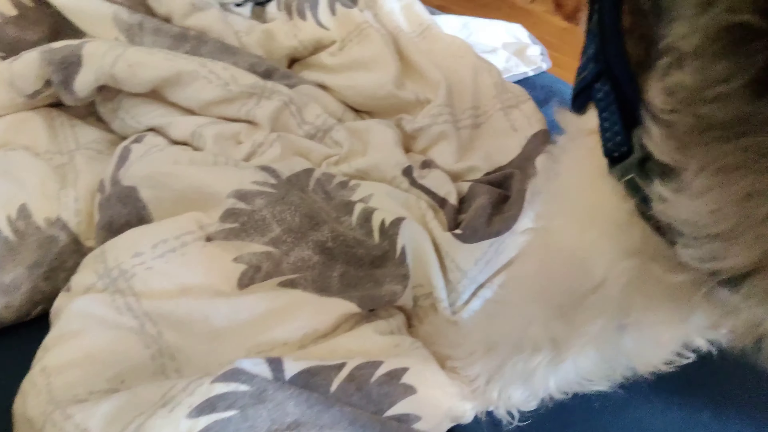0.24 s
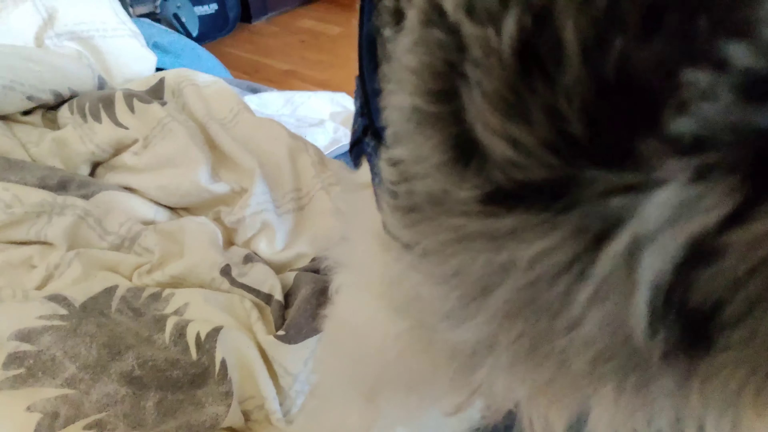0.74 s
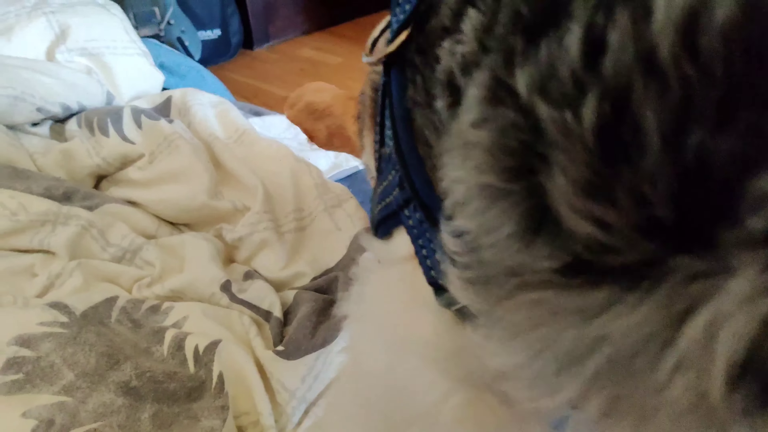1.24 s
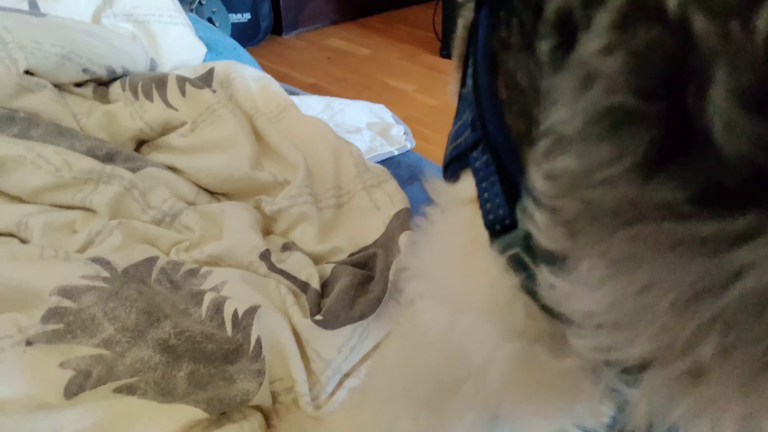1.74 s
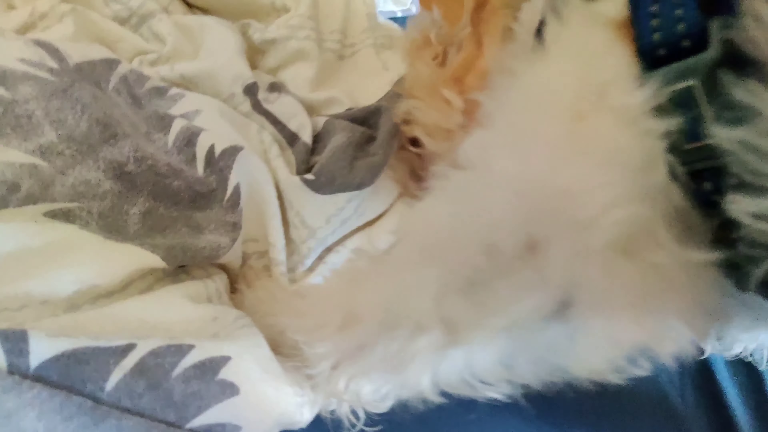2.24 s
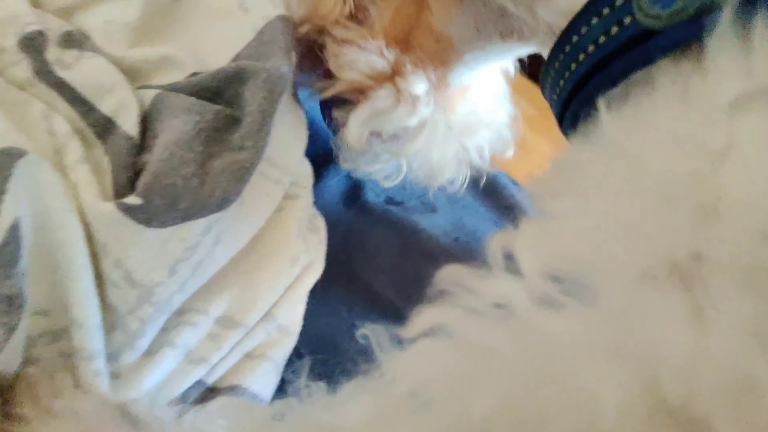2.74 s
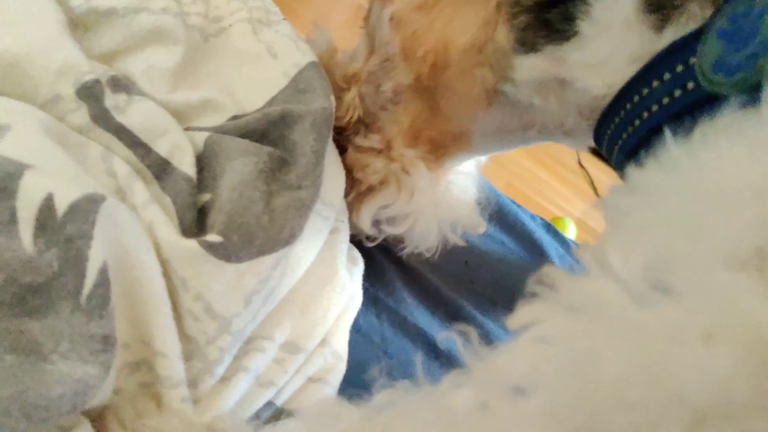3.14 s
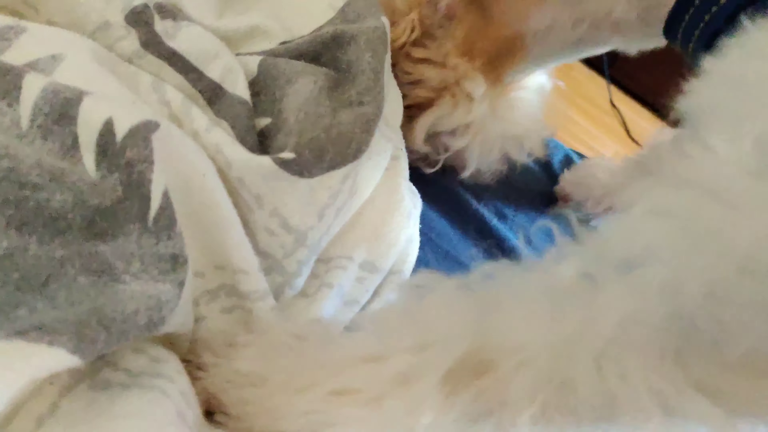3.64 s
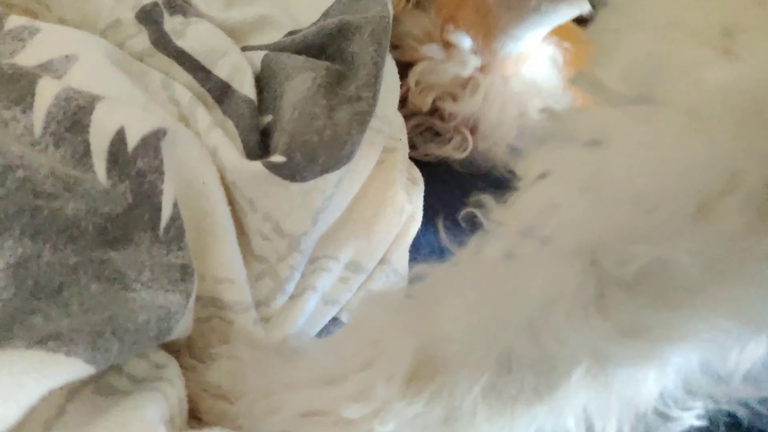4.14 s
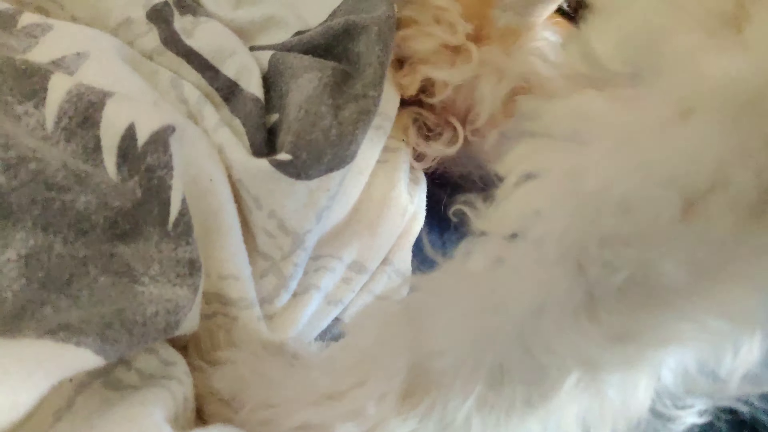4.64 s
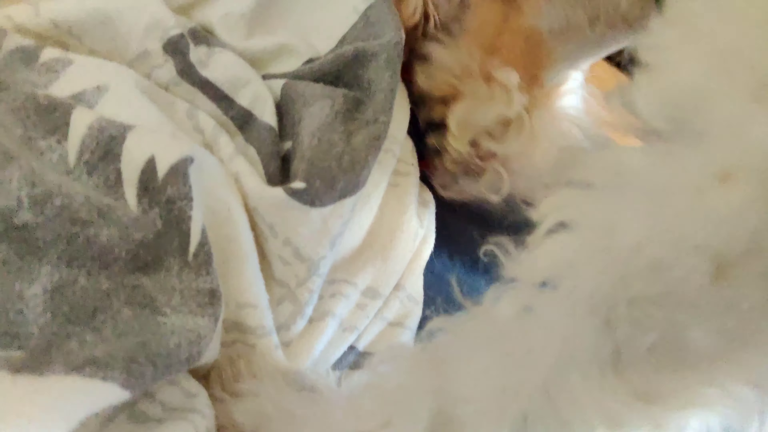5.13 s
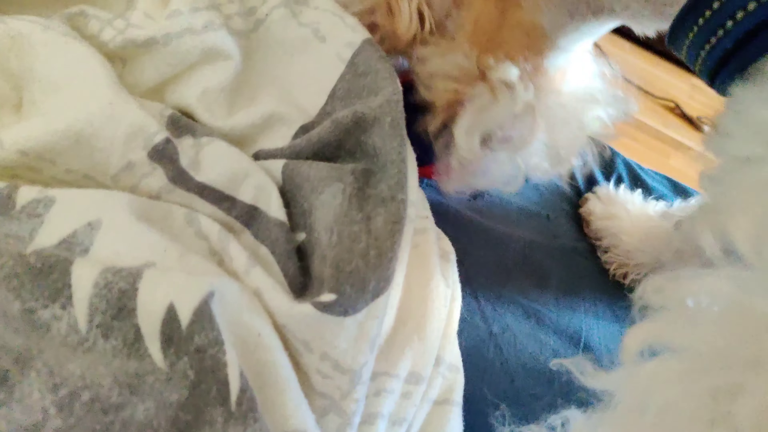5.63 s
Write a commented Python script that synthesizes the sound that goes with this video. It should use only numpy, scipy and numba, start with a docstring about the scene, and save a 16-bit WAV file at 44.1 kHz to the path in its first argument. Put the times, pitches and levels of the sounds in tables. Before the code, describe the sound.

Close to the microphone, a dog chews a squeaky toy on a bed in a small furnished room. Piercing squeaks swoop up and down in quick flurries, some short and breathy, the loudest just before four seconds. Soft thumps, cloth rustle and low mattress rumble run underneath. The toy then falls silent, leaving bumps and faint tooth clicks, before two final squeals.

```python
"""A dog on a bed bites a squeaky toy close to a phone, in a small furnished room.
At the start the room still rings from a squeak just over; then flurries of bites follow, busiest near 3.7 s.
Each squeeze drives air past a reed whose pitch glides with pressure: a stack of gliding partials plus hiss.
From about 4.2 s the toy is silent while paws and jaws thump the bedding and teeth tick (short damped rings).
Two last squeaks come after 5.4 s; mattress rumble, rustle and hush, all shaped noise, run throughout."""
import sys
import numpy as np
from scipy import signal
from scipy.fft import rfft, irfft, next_fast_len
from scipy.io import wavfile
from scipy.ndimage import uniform_filter1d
from numba import njit

SR = 44100
rng = np.random.default_rng(int(sys.argv[2]) if len(sys.argv) > 2 else 0)


def master_out(mix):
    """Clip the mix to full scale and print it as 16-bit PCM to the path in sys.argv[1]."""
    frames = np.transpose(np.atleast_2d(mix))
    ceiling = np.clip(frames, -1, 1)
    pcm = np.round(ceiling * 32767).astype(np.int16)
    wavfile.write(sys.argv[1], SR, pcm)


N = 259308
LEAD_S = 0.25  # run-in, cut off at the end, so that the room already rings at t = 0
M = N + int(LEAD_S * SR)
T = np.arange(M) / SR - LEAD_S

# All levels below are relative, ahead of later filters and the phone's limiter.
# mattress rumble spectrum: [f/Hz, level/dB per Hz]
RUMBLE_SPECTRUM = [(8.8, -35.5), (15, 10), (50, 1.5), (75, -8.5), (108, -7), (193, -14), (250, -25.5),
                   (320, -62.5), (550, -120)]
# cloth rustle and scuff spectrum: [f/Hz, level/dB per Hz]
CLOTH_SPECTRUM = [(120, -16.5), (220, -8.5), (500, -6), (900, -4), (1400, -15.5), (3000, -19.5)]
# quiet hiss of the room: [f/Hz, level/dB per Hz]
HUSH_SPECTRUM = [(120, -35.5), (200, -3), (416, -4.5), (538, -14.5), (791, -19.5), (1370, -14),
                 (3490, -26.5), (9230, -25.5), (16000, -33)]
# air rushing past the reed, also the colour of the fur: [f/Hz, level/dB per Hz]
AIR_SPECTRUM = [(700, -14), (1300, -16), (3000, -5.5), (5500, -9.5), (9000, -8), (16000, -17.5)]
# the dog's weight heaves the mattress: [t/s of the peak, level/dB]
MATTRESS_HEAVES = [(.05, -54), (.34, -48.5), (.62, -63), (0.842, -44), (1.4, -43.5), (1.65, -48.5),
                   (2.15, -41.5), (2.49, -42), (2.8, -49.5), (3, -47.5), (3.22, -49), (3.66, -39.5),
                   (4.079, -53), (4.29, -33.5), (4.919, -48), (5.43, -44), (5.69, -45.5)]
# how much the dog stirs in the bedding: [t/s, level/dB]
STIRRING = [(0, -71), (.35, -64), (.8, -61.5), (1.17, -78), (1.33, -73), (1.5, -50), (1.92, -71.5),
            (2.15, -59), (2.65, -54.5), (3.1, -63), (3.3, -63.5), (3.68, -55), (4.1, -51.5), (4.3, -66),
            (4.5, -76.5), (4.9, -76), (5.44, -72.5), (5.69, -46), (5.88, -69.5)]
# decay of the room by band: [f/Hz of the centre, T60 t/s, level/dB]
ROOM_BANDS = [(198.2, .45, -7), (974, 0.31, -6), (2600, 0.37, -5), (5000, 0.37, -10), (7740, 0.34, -9.5),
              (13300, 0.17, -2.5)]
# bedding and muzzle throw the toy straight back: [left delay t/ms, right delay t/ms, level/dB]
FIRST_REFLECTIONS = [(.7, 0.53, -10.5), (1.52, 1.25, -25.5), (2.38, 1.5, -16), (3.06, 2.4, -5),
                     (6.76, 6, -10.5), (10.05, 14, -9)]
# the phone's body shades its two ports unequally: [f/Hz, left minus right level/dB]
PORT_SHADE = [(300, -8), (1500, -1.7), (3000, -2.85), (5000, 2.5), (7000, -2.8), (9000, -16.5),
              (12000, -14), (16000, -6.5)]
# dull bumps on the bedding: [t/s, level/dB, bass share level/dB]
BEDDING_BUMPS = [(0.27, -41.5, -3), (0.39, -42.5, -7), (0.588, -41.5, -19), (0.817, -35.5, -10),
                 (1.287, -52.5, -13.5), (1.32, -34.5, -30), (1.363, -36, 1), (1.407, -39, -6),
                 (1.634, -31.5, -28), (1.856, -33.5, -7.5), (2.051, -40.5, -2), (2.112, -26.5, -1.5),
                 (2.405, -35, -2.5), (2.47, -37, -3), (2.752, -31.5, -27), (3.103, -38.5, 1),
                 (3.239, -37, -18), (3.447, -28.5, -18), (3.657, -47, 9), (3.913, -41, -19),
                 (4.231, -39, 14), (4.273, -35, -12), (4.54, -54.5, -10), (4.887, -53, 3.5),
                 (5.081, -45.5, -15), (5.274, -50, -14), (5.325, -48, -11), (5.367, -49.5, 0),
                 (5.395, -53, 3), (5.425, -42.5, 3), (5.469, -33.5, -21), (5.642, -41, 5)]
# dry ticks of teeth and claws: [t/s, level/dB, ring f/Hz]
TEETH_TICKS = [(0.1846, -63, 2790), (1.2744, -54.5, 5900), (3.104, -61, 5860), (4.616, -58, 5600),
               (4.7216, -47, 5460), (4.7275, -46, 5240), (4.7773, -47.5, 5850), (4.794, -53, 2260),
               (4.8437, -60, 2960), (5.0828, -44.5, 2630), (5.3306, -57.5, 5200)]
# one curve a squeak, each a list of points: [t/s, pitch f/Hz, air jet level/dB]
SQUEAK_CURVES = [
    [(-0.2, 2500, -26.5), (-0.14, 4070, -12), (-0.09, 2810, -23.5), (-0.06, 1282, -16.5)],
    [(0.385, 3810, -33), (0.389, 3020, -18), (0.403, 3360, -11), (0.41, 4070, -10.5), (0.425, 4905, -6),
     (0.445, 5300, -8.5), (0.48, 6210, 0.5), (0.49, 5770, -6), (0.5, 4650, -6.5), (0.513, 3965, -11.5),
     (0.525, 3114, -12.5), (0.532, 2017, -23.5), (0.543, 1450, -12)],
    [(0.59, 1303, -15.5), (0.6, 3066, -9.5), (0.608, 2636, -19)],
    [(0.66, 2950, -40), (0.7, 2943, -22.5), (0.76, 2893, -22.5), (0.816, 2900, -24)],
    [(0.818, 2790, -21.5), (0.825, 4640, -10), (0.835, 5204, -3), (0.84, 4667, -5.5), (0.848, 4550, -2.5),
     (0.853, 4100, -7), (0.875, 2357, -11.5), (0.9, 1213, -10.5)],
    [(1.375, 3370, -50), (1.4, 3500, -32.5), (1.404, 2634, -13.5), (1.43, 3087, -6), (1.453, 3042, -10.5),
     (1.458, 3566, 2.5), (1.468, 3770, -26.5), (1.478, 3947, -5), (1.495, 3770, -16), (1.51, 3230, -3.5),
     (1.53, 3047, -15.5), (1.545, 2637, -15)],
    [(1.582, 1323, -14), (1.59, 2856, -7), (1.6, 3490, -9.5), (1.615, 3950, -8.5), (1.63, 3660, -11),
     (1.648, 3578, -1.5), (1.658, 4205, -7.5), (1.668, 4334, -1.5), (1.677, 5310, -8.5),
     (1.686, 4750, -1.5), (1.703, 3820, -9), (1.73, 1907, -14), (1.748, 1146, -17.5)],
    [(2.14, 3500, -22), (2.148, 3125, -21), (2.17, 2986, -21), (2.185, 3130, -26), (2.195, 3040, -15.5),
     (2.228, 3063, -20.5), (2.25, 3080, -61)],
    [(2.27, 1336, -11), (2.283, 1560, -10.5), (2.295, 1518, -11), (2.31, 1397, -12.5), (2.325, 1227, -15),
     (2.335, 1407, -19)],
    [(2.512, 3345, -56.5), (2.525, 3530, -18.5), (2.529, 2900, -11), (2.5385, 2752, -11.5),
     (2.54, 1850, -11), (2.547, 2107, -11), (2.551, 3060, -10), (2.563, 3390, -11), (2.575, 4850, -9),
     (2.59, 6270, 0), (2.603, 7140, -7), (2.615, 6090, -7.5), (2.63, 5100, -10), (2.645, 3910, -13),
     (2.657, 3100, -13), (2.668, 1635, -20), (2.678, 1400, -18.5)],
    [(2.744, 2487, -24.5), (2.754, 2236, -13), (2.757, 1300, -14.5), (2.765, 1596, -11), (2.78, 1407, -8.5),
     (2.8, 1390, -8), (2.825, 1285, -10.5), (2.845, 1287, -20)],
    [(2.875, 2700, -34), (2.884, 2480, -22), (2.893, 2500, -24), (2.9, 2833, -32.5), (2.912, 2545, -21.5),
     (2.92, 2250, -19), (2.93, 2555, -31)],
    [(3.218, 2980, -45.5), (3.227, 3316, -24.5), (3.23, 2667, -12), (3.2445, 2785, -17.5),
     (3.2455, 1727, -22.5), (3.265, 1873, -16), (3.275, 2230, -14.5), (3.285, 2857, -17.5),
     (3.292, 3208, -10.5), (3.315, 3225, -10.5), (3.335, 3247, -9), (3.345, 1995, -17), (3.352, 1490, -20),
     (3.36, 1300, -23)],
    [(3.447, 1495, -17), (3.455, 1746, -10.5), (3.465, 2083, -9.5), (3.48, 2441, -9.5), (3.492, 2698, -5),
     (3.5, 3200, -17), (3.525, 3180, -16), (3.548, 3284, -11.5), (3.558, 3505, -6), (3.565, 4050, -7),
     (3.575, 4013, -4.5), (3.585, 3550, -8), (3.595, 2470, -10.5), (3.602, 2596, -14), (3.62, 2353, -19)],
    [(3.69, 2800, -26), (3.694, 2787, -4.5), (3.712, 4290, -1.5), (3.722, 5000, -7), (3.733, 6405, 6),
     (3.75, 7040, -4.5), (3.77, 7600, -11), (3.787, 7270, -2), (3.797, 6240, 0.5), (3.81, 5000, -6.5),
     (3.825, 3920, -17), (3.835, 3200, -12.5), (3.845, 1820, -15), (3.858, 1380, -29)],
    [(3.918, 1164, -11), (3.926, 1438, -20), (3.945, 1552, -8.5), (3.958, 1787, -14), (3.972, 1628, -7.5),
     (3.98, 1810, -7), (4.0, 2013, -8.5), (4.008, 2547, -11.5), (4.016, 3070, -9.5), (4.04, 3188, -9.5),
     (4.078, 3247, -10.5), (4.087, 3692, -3), (4.095, 4208, 0.5), (4.105, 3884, -6), (4.12, 2364, -8.5),
     (4.142, 1213, -13)],
    [(5.442, 3064, -49), (5.459, 3174, -31.5), (5.465, 2570, -15), (5.475, 2887, -15), (5.481, 2196, -14.5),
     (5.49, 3110, -8.5), (5.502, 3230, -30), (5.512, 3125, -11.5), (5.517, 2840, -21.5), (5.526, 2766, -10),
     (5.535, 2201, -19.5), (5.55, 2340, -23), (5.568, 1647, -17.5), (5.578, 1510, -29)],
    [(5.628, 2414, -23), (5.638, 2255, -11), (5.65, 3336, -12), (5.658, 4027, -8), (5.666, 4860, -6),
     (5.684, 4430, 0), (5.703, 4497, -8), (5.71, 4274, -3), (5.725, 3210, -9), (5.74, 1910, -14.5),
     (5.755, 1285, -12.5)],
]
# character of each squeak: [left minus right level/dB, delay at the left port t/ms, hiss level/dB,
# slope per partial at the start/dB, slope per partial at the end/dB, even partials level/dB, rasp 0-1]
SQUEAK_TRAITS = [(0.9, -0.044, -20.5, 7, -3.5, 0.9, 0), (3, .01, -23, -2, -0.5, -1, 0.09),
                 (2.5, 0.11, -15, -2.5, -3.5, -0.6, 0.02), (3.5, .16, -27.5, -15.5, -19.5, -9, 0.1),
                 (5.5, 0.08, -16, -2, -6.5, -5.5, 0.13), (4.5, 0.059, -15, -5.5, -1.5, -2.5, 0.1286),
                 (3.5, 0.011, -15.5, -10, -8, -3.5, 0.1086), (-0.2, 0.087, -35.5, -9, -10, -1, 0.028),
                 (3, 0.077, -14, -2, -2.5, -1.1, .02), (2.6, -0.014, -33, -2, -2, -0.1, 0.045),
                 (0, -.02, -15.5, -3.5, -3, -1.5, .02), (11.5, -.08, -13.5, -12.5, -16, -2.3, 0),
                 (3, -0.027, -13.5, 0, -0.5, 2, .05), (1.5, -.005, -15, -0.5, -14.5, 0.95, 0.047),
                 (3, -0.025, -21, -7, 1.5, -1.1, 0.089), (0.3, -0.012, -15, -3.5, -8.5, 0.1, 0.041),
                 (-0.5, 0.016, -15.5, -1.5, 0, 2, 0.079), (4.5, .055, -16, -0.5, -1.5, -7, 0.14)]
# the reed beats strong-weak, adding lines at half the pitch: [from t/s, to t/s, depth 0-1]
REED_DOUBLING = [(.389, .402, .4), (1.404, 1.42, .5), (2.529, 2.55, .25), (3.2455, 3.284, .75),
                 (3.447, 3.48, .45), (5.46, 5.483, .3)]
# the squeaker's hollow body favours partials that pass its resonance: [f/Hz, level/dB]
BODY_RESONANCE = [(1200, -14.5), (2000, -10.5), (2700, -8.5), (3300, -8.5), (4200, -6), (4800, 0),
                  (5400, 1.5), (6300, -6), (7500, -10.5), (8500, -7.5), (9600, -7.5), (11500, -25),
                  (16000, -28)]
# [f/Hz, level/dB] each: bump bass (per Hz), padding that swallows treble,
# the dog's head shading the treble, a toy too small to radiate lows
BUMP_BASS = [(30, -19.5), (70, 7.5), (190, 1.5), (350, -26.0)]
PADDING = [(1000, 0.0), (1700, -17.5), (4000, -46.5)]
HEAD_SHADOW = [(6000, 0.013), (14000, -2)]
SMALL_TOY = [(800, -16), (1250, 0)]

SWELL_DB_PER_S, SETTLE_DB_PER_S, REST_DB = 93.5, 132, -71.5  # mattress heaves
FUR_DB, HUSH_DB = 0, -75  # fur relative to the stirring level
BUMP_T60_S, WOBBLE_T60_S = 0.07, 0.23
STRAND_DB = 2.5  # spread of the slow fading of the partials
SOFT_DB, PURER = -23.5, 0.5  # below this jet level the partials fall PURER dB more per dB
HISS_DB_PER_OCTAVE = -8.5  # above 3 kHz, less air leaks past a higher-singing reed
TOP_HZ = 16250
LIMIT_DB, LIMIT_RATIO, ATTACK_S, RELEASE_S = -7, 1.4, 0.002, 0.052


def undb(db):
    """Decibels to an amplitude factor."""
    return 10 ** (np.asarray(db) / 20)


def shape(table, hz):
    """Read a [f/Hz, value] table on a log-frequency axis."""
    f, v = np.transpose(table)
    return np.interp(np.log(np.maximum(hz, 1)), np.log(f), v)


def colour(x, table):
    """Filter by a [f/Hz, level/dB] spectrum."""
    size = next_fast_len(x.shape[-1])
    gain = undb(shape(table, np.fft.rfftfreq(size, 1 / SR)))
    return irfft(rfft(x, size) * gain, size)[..., :x.shape[-1]]


def noise(table, alike):
    """Two-channel noise of rms 1; alike is the likeness of left and right."""
    alike = np.clip(alike, 0, 1)
    mid, side = colour(rng.standard_normal((2, M)), table)
    pair = np.sqrt(1 + alike) * mid + np.sqrt(1 - alike) * side * np.array([[1], [-1]])
    return pair / pair.std()


def walk(rate):
    """Smooth random wandering of spread 1, with rate fresh values per second."""
    k = int(SR / rate)
    steps = np.repeat(rng.standard_normal(M // k + 1), k)[:M]
    smooth = uniform_filter1d(uniform_filter1d(steps, k), k)
    return smooth / smooth.std()


def bedding():
    """Mattress rumble swells and settles with each heave; cloth and fur rustle over the hush of the room."""
    heave = 0
    for s, db in MATTRESS_HEAVES:
        drop_db = np.where(T < s, SWELL_DB_PER_S * (s - T), SETTLE_DB_PER_S * (T - s))
        heave = heave + undb(db - drop_db)
    stir_db = np.interp(T, *np.transpose(STIRRING))
    rumble = noise(RUMBLE_SPECTRUM, 0.96) * (heave + undb(REST_DB)) * undb(2 * walk(12))
    rustle = noise(CLOTH_SPECTRUM, 0.8) * undb(stir_db + 4 * walk(40))
    fur = noise(AIR_SPECTRUM, 0.51) * undb(stir_db + FUR_DB + 2.5 * walk(83))
    hush = noise(HUSH_SPECTRUM, 0.36) * undb(HUSH_DB)
    return rumble + rustle + fur + hush


def room(x, gap_s=0.006, rise_s=0.016):
    """Dense reflections: noise that dies away band by band, unrelated at the two ports."""
    t = np.arange(int(0.7 * SR)) / SR
    hz = np.fft.rfftfreq(len(t), 1 / SR)
    dense = rfft(rng.standard_normal((2, len(t))))
    tail = 0
    for k, (_, t60, db) in enumerate(ROOM_BANDS):
        # overlapping bands: full at this centre, gone at its neighbours
        share = shape([(row[0], j == k) for j, row in enumerate(ROOM_BANDS)], hz)
        band = irfft(dense * share, len(t))
        tail = tail + band * undb(db - 60 * t / t60) / np.sqrt(SR * t60 / np.log(1e6))
    tail = tail * np.clip((t - gap_s) / rise_s, 0, 1)
    return signal.fftconvolve(x[None], tail, axes=1)[:, :M]


def nearby(x):
    """The sound plus first reflections of alternating sign: a comb that differs between the ports."""
    out = x.copy()
    for k, (*lag_ms, db) in enumerate(FIRST_REFLECTIONS):
        for ch in range(2):
            lag = int(lag_ms[ch] * SR / 1000)
            out[ch, lag:] += (-1) ** k * undb(db) * x[ch, :-lag]
    return out


def bumps(push_s=0.0014):
    """Each bump is a short push, then muffled cloth noise and a longer mattress wobble."""
    out = np.zeros((2, M))
    cloth, bass = noise(CLOTH_SPECTRUM, 0.84), noise(BUMP_BASS, 0.97)
    for s, db, bass_db in BEDDING_BUMPS:
        on = np.flatnonzero((T > s) & (T < s + 0.3))
        t = T[on] - s
        push = -np.sin(np.pi * t / push_s) * np.exp(-t / (1.7 * push_s))
        scuff = 0.55 * cloth[:, on] * undb(-60 * t / BUMP_T60_S)
        wobble = 0.5 * undb(bass_db) * bass[:, on] * undb(-60 * t / WOBBLE_T60_S)
        wobble = wobble * (1 - np.exp(-t / 0.0015))  # soft onset
        out[:, on] += undb(db) * (0.64 * push + scuff + wobble)
    return colour(out, PADDING)


def ticks(t60=0.0064):
    """Hard little contacts: one quickly damped ring each, roughened by noise."""
    out = np.zeros(M)
    for s, db, hz in TEETH_TICKS:
        on = np.flatnonzero((T > s) & (T < s + 0.02))
        t = T[on] - s
        ring = np.sin(2 * np.pi * hz * t) + 0.479 * rng.standard_normal(len(on))
        out[on] += undb(db) * ring * undb(-60 * t / t60)
    return out


def toy(edge_s=0.00067):
    """Reed partials on the gliding pitch, raspy, with air hiss; returns near sound and what the room gets."""
    near, far = np.zeros((2, M)), np.zeros(M)
    flutter_db, drift = 1.2 * walk(150), 1 + 0.006 * walk(200)
    air = noise(AIR_SPECTRUM, 1)[0]
    shake, stumble = walk(2500), walk(1800)
    # fur and jaws move around the toy: partials fade and swell on four separate drifts
    strands = [STRAND_DB * walk(90) for _ in range(4)]
    weak = sum(depth * ((T > start) & (T < end)) for start, end, depth in REED_DOUBLING)
    for curve, traits in zip(SQUEAK_CURVES, SQUEAK_TRAITS):
        pan_db, lag_ms, air_db, first_db, last_db, even_db, rasp = traits
        s, *columns = np.transpose(curve)
        on = np.flatnonzero((T > s[0]) & (T < s[-1]))
        t = T[on]
        hz, jet_db = (np.interp(t, s, c) for c in columns)
        # beats come early or late, strong or weak; the timing smears the upper partials most
        turn = 2 * np.pi * np.cumsum(hz * drift[on]) / SR + rasp * stumble[on]
        slope_db = np.interp(t, s[[0, -1]], [first_db, last_db])
        slope_db = slope_db + PURER * np.minimum(jet_db - SOFT_DB, 0)
        partials_db = []
        for k in range(1, 13):
            reed_db = jet_db + slope_db * (k - 1) + even_db * (1 - k % 2)
            partials_db.append(reed_db + shape(BODY_RESONANCE, k * hz) + strands[k % 4][on])
        gate = np.clip(np.minimum(t - s[0], s[-1] - t) / edge_s, 0, 1) * undb(flutter_db[on])
        gate = gate * (1 + rasp * shake[on]) * (1 + weak[on] * np.cos(turn / 2))
        leak_db = HISS_DB_PER_OCTAVE * np.log2(np.maximum(hz / 3000, 1))
        hiss = air[on] * undb(air_db + jet_db + leak_db)
        for ch, side in enumerate((0.5, -0.5)):
            # half the delay and level difference goes to each port
            late = turn - side * 2 * np.pi * hz * lag_ms / 1000
            tone = 0
            for k, db in enumerate(partials_db, 1):
                tone = tone + np.sqrt(2) * undb(db) * np.sin(k * late) * (k * hz < TOP_HZ)
            near[ch, on] += gate * (tone + hiss) * undb(side * pan_db)
        far[on] += gate * (tone + hiss)  # the room gets the right port's phase, unpanned
    # the dog's head stands between toy and phone
    near = colour(near, HEAD_SHADOW)
    return colour(near, SMALL_TOY), colour(far, SMALL_TOY)


@njit
def follow(x, rise, fall):
    """Envelope that climbs fast and sinks slowly."""
    out, e = np.empty(len(x)), 1e-6
    for i in range(len(x)):
        e += (x[i] - e) * (rise if x[i] > e else fall)
        out[i] = e
    return out


def scene():
    """Toy and ticks ring in the room and pass the phone's shading; bumps and bedding join them."""
    near, far = toy()
    tick, bump = ticks(), bumps()
    reverb = room(far + 0.4 * tick + 0.2 * bump[0])
    heard = undb(-3) * nearby(near) + tick + reverb
    shade = np.array(PORT_SHADE)
    left = colour(heard[0], shade * [1, 0.5])
    right = colour(heard[1], shade * [1, -0.5])
    return (np.array([left, right]) + bump + bedding())[:, M - N:]


def record(dry):
    """The phone turns loud squeals down, rounds the peaks and cuts the top."""
    env = follow(np.abs(dry).max(axis=0), 1 / (ATTACK_S * SR), 1 / (RELEASE_S * SR))
    held = dry * np.minimum(undb(LIMIT_DB) / env, 1) ** (1 - 1 / LIMIT_RATIO)
    rounded = 0.88 * np.tanh(held / 0.88)
    top_cut = signal.ellip(14, 0.3, 90, TOP_HZ, fs=SR, output="sos")
    return signal.sosfilt(top_cut, rounded)


dry = scene()
out = record(dry)
master_out(out)
```